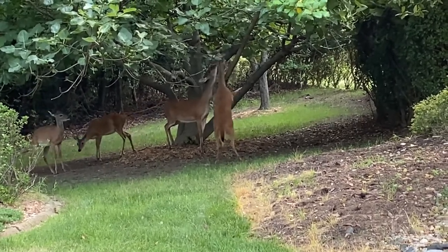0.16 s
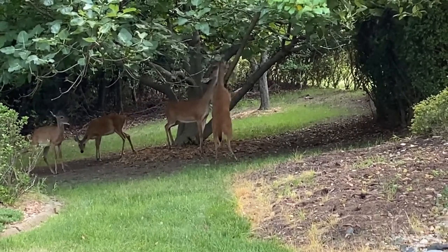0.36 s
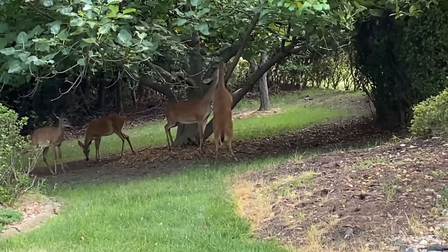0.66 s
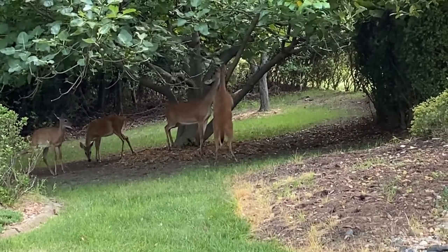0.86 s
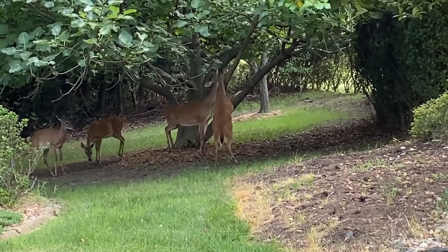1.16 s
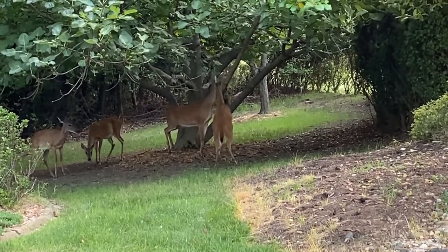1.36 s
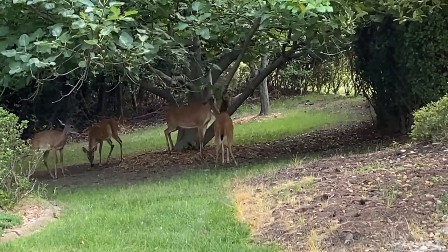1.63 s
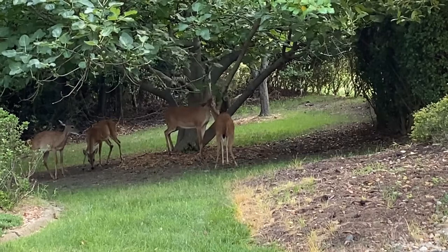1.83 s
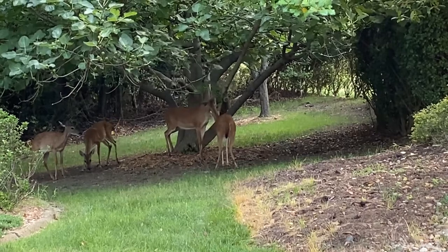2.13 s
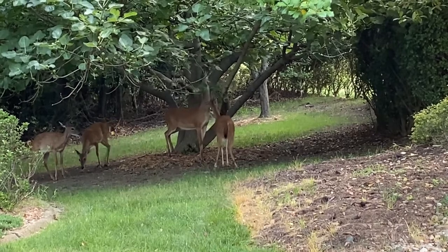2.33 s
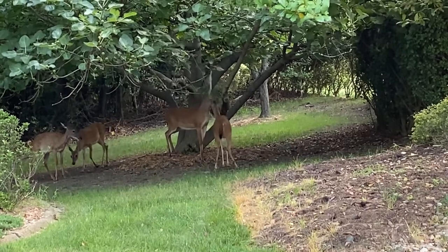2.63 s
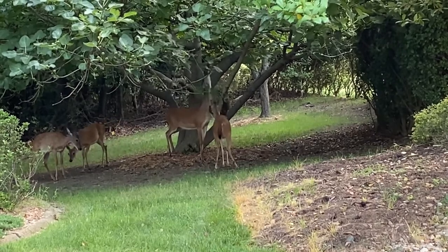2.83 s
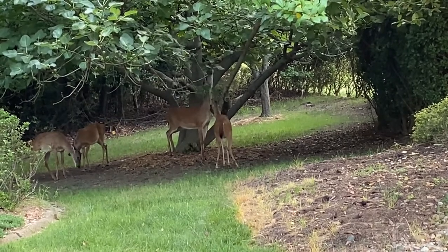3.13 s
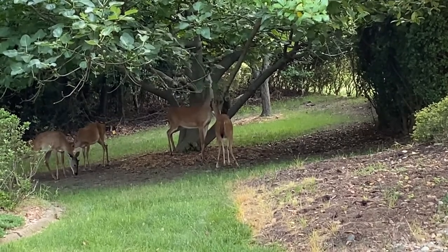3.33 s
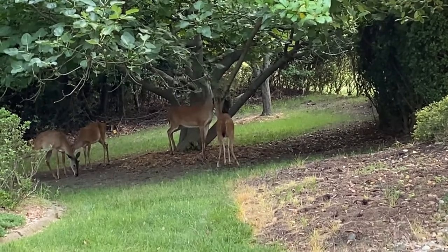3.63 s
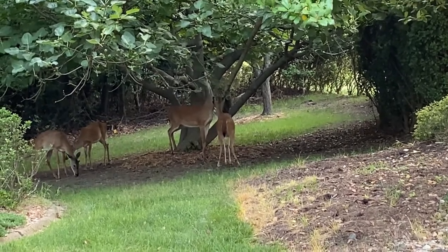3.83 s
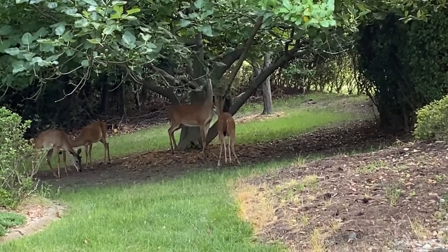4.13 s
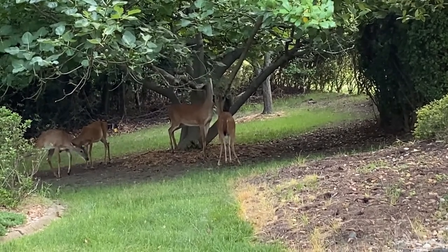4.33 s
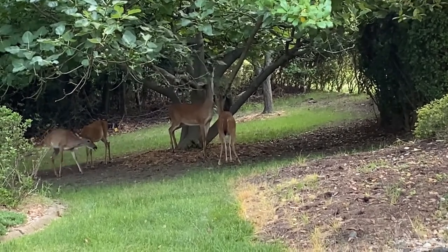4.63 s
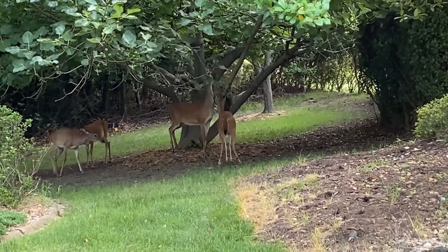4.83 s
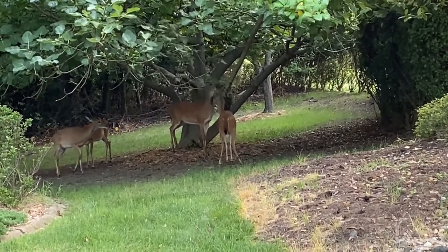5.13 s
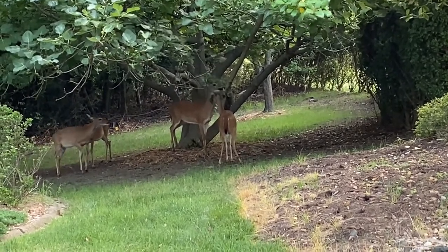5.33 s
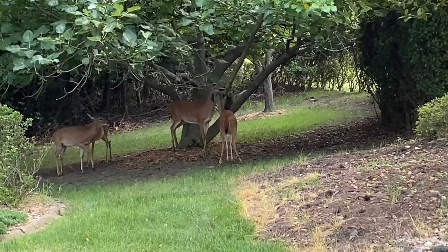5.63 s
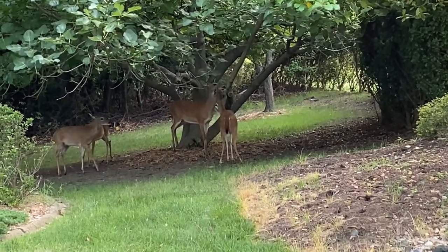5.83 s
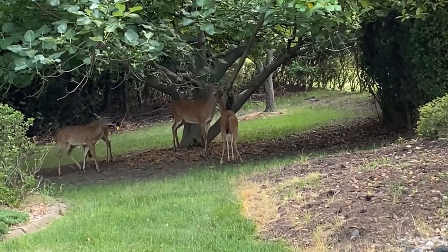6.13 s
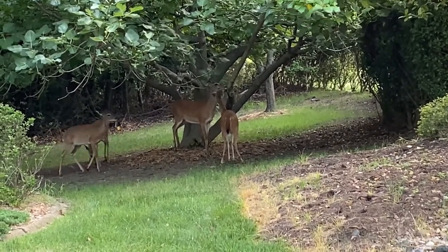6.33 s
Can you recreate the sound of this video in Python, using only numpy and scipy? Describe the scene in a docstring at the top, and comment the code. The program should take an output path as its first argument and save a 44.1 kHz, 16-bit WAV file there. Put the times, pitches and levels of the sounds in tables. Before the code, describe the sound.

A calm summer garden, heard in stereo from a few steps away for about six and a half seconds. Far crickets merge into a continuous, thin ringing drone around 6.6 kilohertz, while a nearer one, slightly lower, buzzes in soft bursts three to four times a second, slowing around 1.8 and quickening after 4.4. A small bird repeats very short, clear chips sweeping up from about 2.7 to 3.7 kilohertz, in pairs or threes, at about 0.5, 1.3, 2.0, 2.7, 3.5, 4.2, 4.9 and 5.8 seconds, with branches and trees returning faint echoes. At 5.0 a dry twig snaps: a sharp tick, then small duller woody cracks. Deep distant traffic rumbles throughout, swelling near 0.4, 1.1, 3.7, 4.2 and 6.1, with faint wavering hum and soft airy hiss.

```python
"""Summer garden with crickets

Heard from a few steps away: crickets trill in the grass as trains of wing strokes, one of them in bursts.
A small bird repeats calls of two or three rising whistled chips, which branches and trees throw back.
A twig snaps once, as noise ticks and short-lived ringing tones.
Under it all lie distant traffic as swelling low noise, a faint machine hum of wavering tones,
and a soft hiss of noise from far roads and leaves, all reaching two microphones set a little apart."""
import sys
import numpy as np
from scipy import signal
from scipy.fft import rfft, irfft
from scipy.io import wavfile

SR = 44100
rng = np.random.default_rng(int(sys.argv[2]) if len(sys.argv) > 2 else 0)


def unload_audio(sound):
    """Save the sound as a 16-bit wav file, at the path given as the first command line argument."""
    columns = np.transpose(np.atleast_2d(sound))
    # keep every value between -1 and 1, then stretch to whole-number steps
    steps = np.round(np.clip(columns, -1, 1) * 32767)
    wavfile.write(sys.argv[1], SR, steps.astype(np.int16))


N = 285327
TIME = np.arange(N) / SR  # s

# Rumble of distant traffic, its relative spectrum: (frequency [Hz], level [dB])
RUMBLE_SPECTRUM = [(12, -35), (23, -17), (32, -16.5), (46, 1), (65, 3.5), (90, 1), (140, -5), (200, -22.5),
                   (400, -48.5)]
# Broad swells of that rumble: (time of top [s], rise [dB], half length [s])
RUMBLE_SWELLS = [(0.402, 4.5, 0.47), (1.077, 5, 0.15), (1.45, 2, .3), (3.735, 3.5, 0.18), (4.22, 4.8, 0.18),
                 (6.126, 5.5, 0.15)]
# Hum of a far machine, before its left-right balance: (frequency [Hz], level [dB])
HUM_TONES = [(120, -60.5), (141, -68), (154.6, -57.5), (194.6, -68), (240, -77)]
# Steady air of far roads, its relative spectrum: (frequency [Hz], level per Hz [dB])
ROAD_AIR_SPECTRUM = [(20, -17), (45, -18.5), (110, -1), (160, -1), (210, -6.5), (300, -11), (500, -16),
                     (800, -19.5), (1200, -22.5), (1900, -24), (3000, -25), (5500, -28.5), (6500, -26.5),
                     (7600, -29.5), (10000, -48)]
# Hiss of the leaves, its relative spectrum: (frequency [Hz], level per Hz [dB])
LEAF_SPECTRUM = [(3000, -29), (6000, -6), (8000, -4.5), (10000, 3.5), (13500, 3.5), (15800, -3)]
# Far crickets that trill on and on: (pitch [Hz], pitch wander [Hz], relative level [dB], wing strokes [1/s])
FAR_CRICKETS = [(6645, 22, 0, 37), (6600, 45, -4, 79), (6690, 30, -6, 54), (6480, 15, -4, 41),
                (6775, 30, -8, 63), (6880, 15, -9, 35)]
# Loudness of the far crickets before trim and waver: (time [s], level [dB])
CHORUS_LOUDNESS = [(0, -58.5), (1.0, -60.5), (1.4, -61), (2.2, -58.5), (2.7, -61), (3.1, -57), (4.1, -60.3),
                   (6.47, -59.5)]
# Pace of the nearest cricket, which slackens and then hurries: (time [s], bursts [1/s])
BURST_PACE = [(0, 3.5), (1.5, 3.5), (1.8, 2.85), (4.03, 2.85), (4.45, 4.15), (6.47, 3.67)]
FIRST_BURST_S, BURST_S = .16, 0.072  # top of the first burst; half length of each
# Chip that arches over: (share of its length [0-1], pitch [Hz], level [dB])
ARCHED_CHIP = [(0, 2750, -18), (.11, 3170, -8), (.22, 3450, -8), (.36, 3590, 0), (.64, 3690, 0),
               (.85, 3635, -3), (1, 3520, -14)]
# Chip that sweeps further up: (share of its length [0-1], pitch [Hz], level [dB])
UPSWEPT_CHIP = [(0, 2750, -16), (.17, 3130, -4), (.32, 3430, -6), (.5, 3590, 2), (.66, 3710, 0),
                (.8, 3790, -2), (1, 3600, -8)]
# Calls of the bird: (time [s], level [dB], wait for the second chip [s], chips in order [a arched, u upswept])
BIRD_CALLS = [(0.504, -44, 0.054, "aua"), (1.292, -44.5, 0.06, "au"), (1.954, -43, 0.056, "au"),
              (2.652, -46, .058, "auu"), (3.452, -45.5, 0.06, "au"), (4.156, -45.5, .061, "au"),
              (4.94, -45.5, 0.063, "aua"), (5.785, -45, 0.062, "au")]
ARCHED_S, UPSWEPT_S = 0.0339, 0.03006  # chip lengths
THIRD_AFTER_S = .180  # from the start of the call
SECOND_DB, THIRD_DB = -2.5, 0.5  # against the first chip
# Cracks of the twig: (time [s], level [dB], share of bright tick [0-1])
TWIG_CRACKS = [(4.977, -48, 1), (4.9845, -52, .2), (4.991, -53, .1), (5.0005, -51, .1), (5.085, -57, .1)]
# Tones the twig's wood rings with: (frequency [Hz], relative level [dB], decay by 60 dB [s])
TWIG_MODES = [(1010, -19, 0.022), (1500, -4, 0.033), (1665, -4, 0.095), (1872, 0, 0.062), (2230, -5, .02),
              (2750, 7, 0.01)]
# Reverberation of the garden: (frequency [Hz], decay by 60 dB [s])
GARDEN_DECAY = [(1000, .3), (1900, 0.36), (3500, 0.81), (7000, 0.74)]
# Likeness of noise at the left and right microphones: (frequency [Hz], likeness [0-1])
MIC_LIKENESS = [(60, .92), (160, .8), (270, .63), (450, .36), (800, .2), (1250, .25), (1700, .5),
                (2100, .94), (3200, .985), (4500, .999), (7000, .998), (8500, .93), (15000, .93)]
# How much earlier sound reaches the left microphone: (frequency [Hz], lead [turns])
LEFT_MIC_LEAD = [(950, 0), (1200, -.28), (1600, -.16), (2050, 0), (2700, 0), (3300, -.05), (3700, -.04),
                 (4100, 0), (7500, 0), (9080, .5), (11200, 1), (13350, 1.5), (15200, 2)]


def gain_of(db):
    """Decibels to gain."""
    return 10 ** (np.asarray(db) / 20)


def evened(x):
    """Scales to rms 1."""
    return x / np.sqrt(np.mean(x ** 2) + 1e-20)


def read(points, hz):
    """Reads a table on a log-frequency axis."""
    f, value = np.transpose(points)
    return np.interp(np.log(hz + 1), np.log(f + 1), value)


def follow(curve):
    """Reads a curve over time at every sample."""
    return np.interp(TIME, *np.transpose(curve))


def add(mix, s, sound):
    """Adds a sound into the mix at time s, cut at the end of the mix."""
    part = mix[..., round(s * SR):][..., :sound.shape[-1]]
    part += sound[..., :part.shape[-1]]


def drift(rate_hz):
    """Slow chance of rms 1, moving up to about this rate."""
    hz = np.fft.rfftfreq(N, 1 / SR)
    spectrum = rfft(rng.standard_normal(N)) * np.exp(-(hz / rate_hz) ** 2)
    return evened(irfft(spectrum, N))


def stereo_noise(spectrum):
    """Noise of a given colour, partly alike at the two microphones."""
    hz = np.fft.rfftfreq(N, 1 / SR)
    left, other = rfft(rng.standard_normal((2, N)))
    same = np.clip(read(MIC_LIKENESS, hz), 0, 1)
    right = same * left + np.sqrt(1 - same ** 2) * other
    coloured = np.array([left, right]) * gain_of(read(spectrum, hz))
    return evened(irfft(coloured, N))


def scatter(x, side_db, build_s):
    """The echo from trunks and leaves: it builds up, then dies band by band."""
    hit = rng.random((2, SR)) < 2500 / SR  # about 2500 reflections a second
    taps = rng.standard_normal((2, SR)) * hit
    hz, t, bands = signal.stft(taps, SR, nperseg=256)
    decay = gain_of(-60 * t / read(GARDEN_DECAY, hz)[:, None])
    bands *= decay * (1 - np.exp(-t / build_s))
    tail = signal.istft(bands, SR, nperseg=256)[1]
    tail = tail / np.linalg.norm(tail[0])
    mid, side = signal.fftconvolve(x[None], tail, axes=1)[:, :N]
    return mid + gain_of(side_db) * np.array([side, -side])


def swaying_scatter(x, side_db, count=4):
    """Moving leaves keep changing the echo: several scatters fade in and out in turn."""
    weights = np.array([drift(2.14) for _ in range(count)])
    weights /= np.linalg.norm(weights, axis=0)
    return sum(w * scatter(x, side_db, build_s=0.019) for w in weights)


def traffic(level_db=-50, lumps_db=1.7, lumps_hz=6):
    """Distant traffic: deep, lumpy low noise with a few broad swells."""
    swell_db = sum(rise_db * np.exp(-((TIME - s) / half_s) ** 2) for s, rise_db, half_s in RUMBLE_SWELLS)
    loudness_db = level_db + swell_db + lumps_db * drift(lumps_hz)
    return gain_of(loudness_db) * stereo_noise(RUMBLE_SPECTRUM)


def hum():
    """Far machine: low steady tones that waver on their way through the air."""
    total = np.zeros(N)
    for hz, db in HUM_TONES:
        level = gain_of(db + 2 * drift(2.5)) * np.sqrt(2)  # rms to peak
        pitch_hz = hz + 0.476 * drift(2.71)
        total += level * np.sin(2 * np.pi * np.cumsum(pitch_hz) / SR)
    return total


def air(wash_db=-55, flutter_db=1.58, lean=0.098, hiss_db=-68):
    """Far roads: a wide soft wash, its low part stronger on the left, with the fine hiss of leaves on top."""
    wash = gain_of(wash_db) * stereo_noise(ROAD_AIR_SPECTRUM)
    low = signal.sosfilt(signal.butter(1, 700, fs=SR, output="sos"), wash)
    wash = wash + low * (gain_of(flutter_db * drift(24)) - 1)  # the breeze makes the far sound come and go
    leaning = lean * low * np.array([[1], [-1]])
    hiss = gain_of(hiss_db) * stereo_noise(LEAF_SPECTRUM)
    return wash + leaning + hiss


def wings(pitch_hz, wander_hz, strokes_hz, sag_hz, unevenness):
    """Each wing stroke sounds a short tone whose pitch sags as the scraper slows, if sag is set."""
    stroke = np.cumsum(strokes_hz * (1 + unevenness * drift(19.5))) / SR % 1  # 0-1 through each stroke
    hz = pitch_hz + wander_hz * drift(58.6) + sag_hz * (.5 - stroke)
    tone = np.sin(2 * np.pi * np.cumsum(hz) / SR)
    return evened(np.sin(np.pi * stroke) ** 2 * tone)


def bursts():
    """The nearest cricket's rhythm, 1 at the top of each burst and near 0 between."""
    pace = follow(BURST_PACE)
    turns = np.cumsum(pace) / SR - FIRST_BURST_S * pace[0]
    from_top_s = (turns - np.round(turns)) / pace
    return np.exp(-(from_top_s / BURST_S) ** 2)


def chorus(level_db=-2.5, wet_db=3, in_step_db=1.26, waver_db=0.34):
    """Far crickets, blurred by echo into one ringing drone that lifts a little in step with the nearest."""
    trills = np.zeros(N)
    for hz, wander_hz, db, strokes_hz in FAR_CRICKETS:
        trills += gain_of(db) * wings(hz, wander_hz, strokes_hz, sag_hz=156, unevenness=.08)
    loudness_db = follow(CHORUS_LOUDNESS) + level_db
    loudness_db = loudness_db + in_step_db * bursts() + waver_db * drift(3.6)
    echo = gain_of(wet_db) * swaying_scatter(trills, side_db=-69.5)
    return gain_of(loudness_db) * evened(trills + echo)


def burst_cricket(level_db=-64.5, between_db=-71.5, waver_db=1.4, wet_db=-1):
    """Nearest cricket: fast wing strokes make a buzzing trill that swells about three or four times a second."""
    trill = wings(pitch_hz=6331, wander_hz=26, strokes_hz=148, sag_hz=0, unevenness=.05)
    alternation_hz = 74 + 12 * drift(22.6)  # strong and weak strokes roughly alternate
    trill = trill * (1 + 0.87 * np.sin(2 * np.pi * np.cumsum(alternation_hz) / SR))
    burst_power = gain_of(level_db + waver_db * drift(6.6)) ** 2 * bursts()
    power = gain_of(between_db) ** 2 + burst_power
    echo = gain_of(wet_db) * swaying_scatter(trill, side_db=-64, count=3)
    return np.sqrt(power) * evened(trill + echo)


def chip(level_db, length_s, shape, shade_db):
    """One nearly pure whistle that sweeps up to its top note; shade sets the level of its lower notes."""
    u = np.linspace(0, 1, int(length_s * SR))
    share, pitch_hz, shape_db = np.transpose(shape)
    hz = np.interp(u, share, pitch_hz)
    lowness = np.interp(hz, [3200, 3620], [1, 0])
    loudness_db = level_db + np.interp(u, share, shape_db) + shade_db * lowness
    swell = gain_of(loudness_db) * signal.windows.tukey(len(u), .12)
    return swell * np.sin(2 * np.pi * np.cumsum(hz) / SR)


def bird(direct_db=0.0, wet_db=-8.0, branch_db=-17, wet_shade_db=5.5):
    """Calls of two or three chips, with quick echoes from branches near the perch and a longer one from trees."""
    song = np.zeros((2, N))
    kinds = {"a": (ARCHED_S, ARCHED_CHIP), "u": (UPSWEPT_S, UPSWEPT_CHIP)}
    for start, call_db, wait, chips in BIRD_CALLS:
        delays, accents_db = (0, wait, THIRD_AFTER_S), (0, SECOND_DB, THIRD_DB)
        for kind, delay, accent_db in zip(chips, delays, accents_db):
            s, db = start + delay, call_db + accent_db
            length_s, shape = kinds[kind]
            # on the straight path the bounce off the lawn cancels part of the lower notes;
            # the trees return them better
            add(song, s, chip(db + direct_db, length_s, shape, shade_db=0.0))
            note = chip(db, length_s, shape, shade_db=wet_shade_db)
            for lag_s in rng.uniform(.003, .014, size=3):
                add(song, s + lag_s, gain_of(branch_db) * note)
            echo = scatter(note, side_db=-15, build_s=.05)
            add(song, s, gain_of(wet_db) * echo)
    # at the start the echo of an earlier chip is still dying away
    add(song, 0, gain_of(wet_db) * echo[:, SR // 10:])
    return song


def twig(tick_db=3.5, ring_db=-3.5, wet_db=-2):
    """A dry twig breaks with one sharp tick and a few duller cracks that ring its wood."""
    t = np.arange(SR // 8) / SR
    ticks, rings = np.zeros(N), np.zeros(N)
    bright = signal.butter(3, [1000, 6300], "bandpass", fs=SR, output="sos")
    for s, db, share in TWIG_CRACKS:
        for hz, mode_db, t60 in TWIG_MODES:
            pitch_hz = hz * rng.uniform(.95, 1.05)  # each crack leaves the wood a little changed
            fade = gain_of(db + ring_db + mode_db - 60 * t / t60)
            add(rings, s, fade * np.sin(2 * np.pi * pitch_hz * t))
        tick = evened(signal.sosfilt(bright, rng.standard_normal(len(t)))) * np.exp(-t / .0016)
        add(ticks, s, share * gain_of(db + tick_db) * tick)
    echo = scatter(rings + 0.35 * ticks, side_db=-26, build_s=0.0042)
    return ticks + rings + gain_of(wet_db) * echo


def scene():
    """All that sounds in the garden, the traffic and the hum slightly stronger on the left."""
    low = traffic() * gain_of([[.3], [-.3]]) + hum() * gain_of([[1.1], [-1.1]])
    return low + air() + chorus() + burst_cricket() + bird() + twig()


def record(dry):
    """Sound reaches the two microphones at slightly different times, then loses its extreme treble."""
    hz = np.fft.rfftfreq(N, 1 / SR)
    right = irfft(rfft(dry[1]) * np.exp(-2j * np.pi * read(LEFT_MIC_LEAD, hz)), N)
    low_pass = signal.firwin(801, 15780, window=("kaiser", 9), fs=SR)  # edge in Hz
    return signal.oaconvolve(np.array([dry[0], right]), low_pass[None], "same")


dry = scene()
out = record(dry)
unload_audio(out)
```